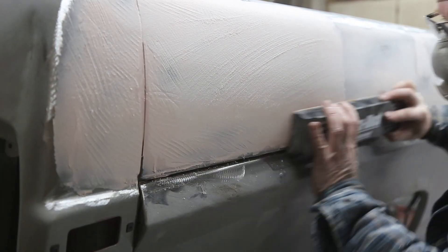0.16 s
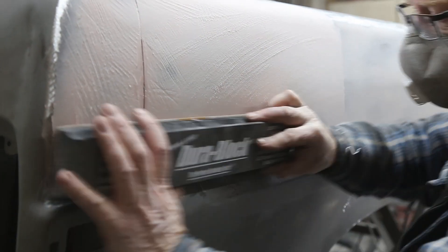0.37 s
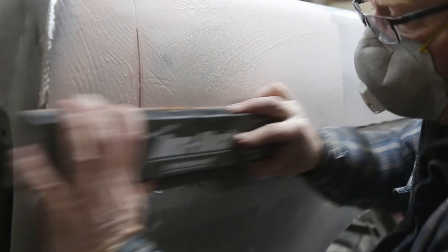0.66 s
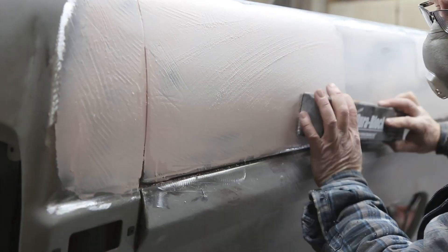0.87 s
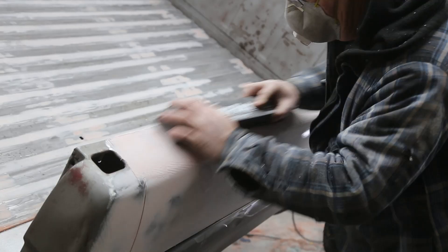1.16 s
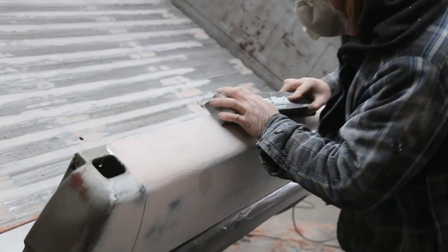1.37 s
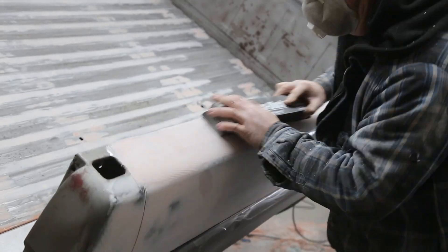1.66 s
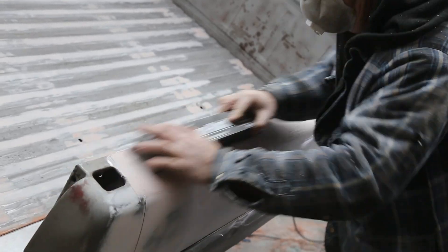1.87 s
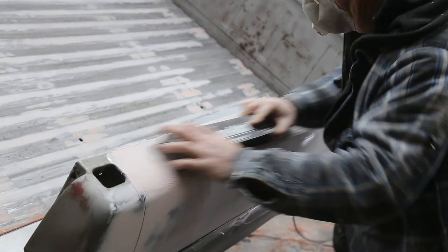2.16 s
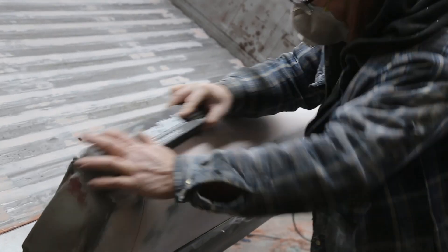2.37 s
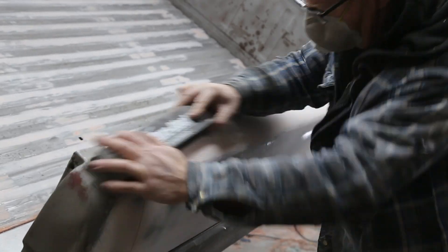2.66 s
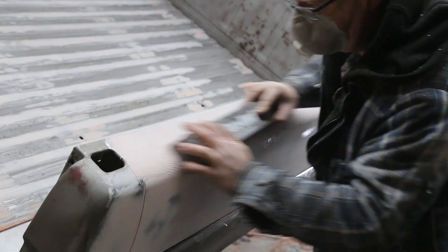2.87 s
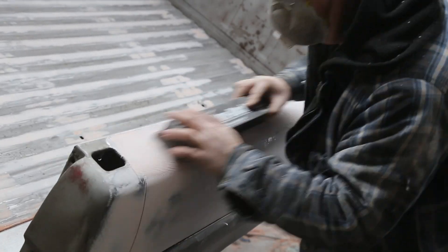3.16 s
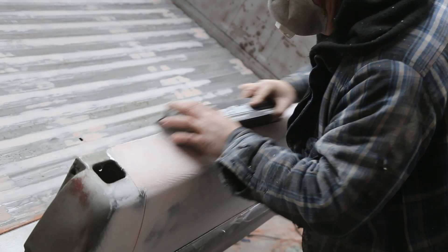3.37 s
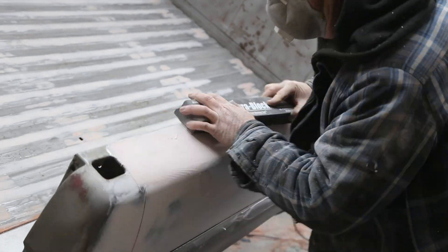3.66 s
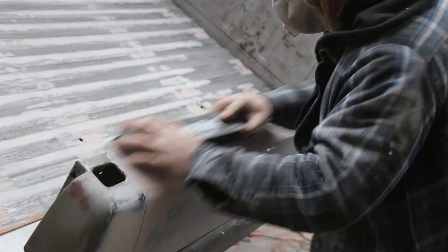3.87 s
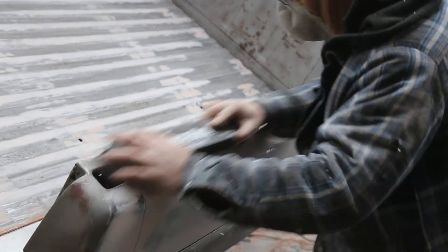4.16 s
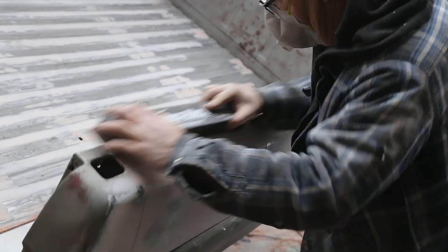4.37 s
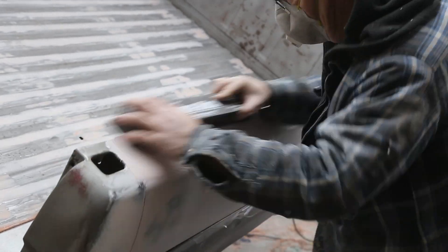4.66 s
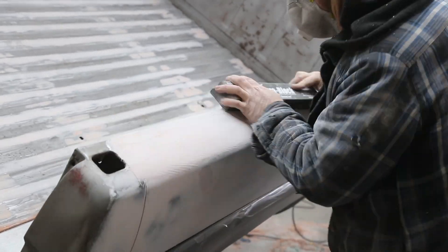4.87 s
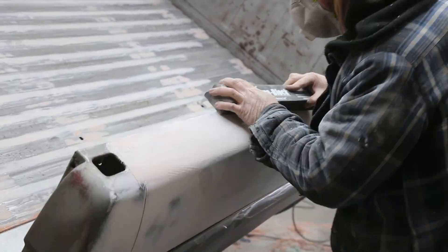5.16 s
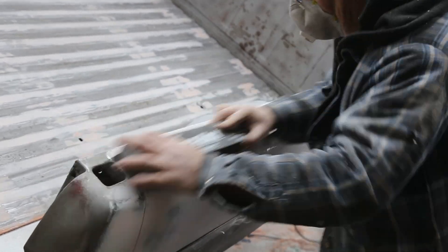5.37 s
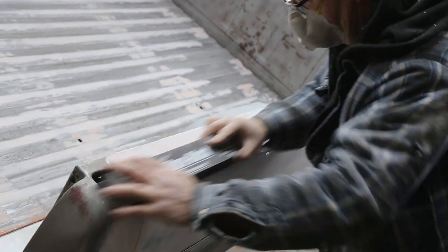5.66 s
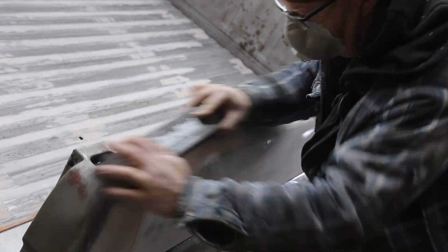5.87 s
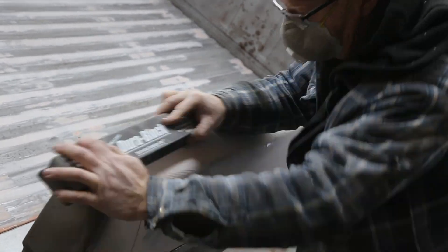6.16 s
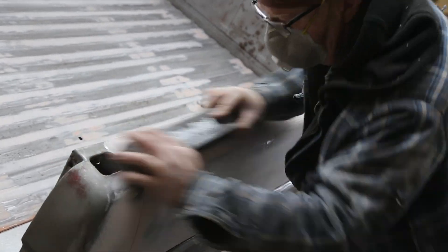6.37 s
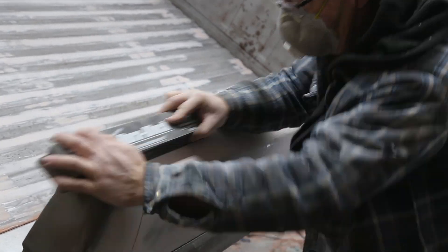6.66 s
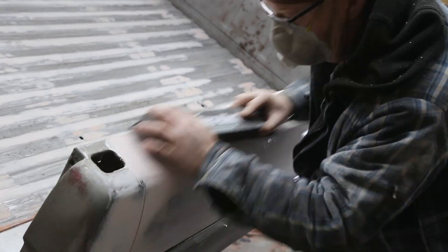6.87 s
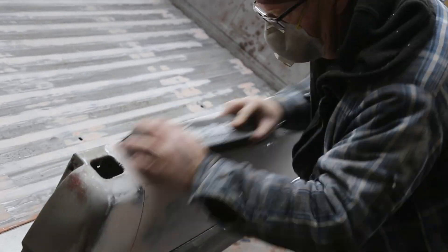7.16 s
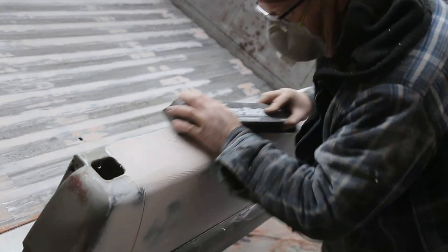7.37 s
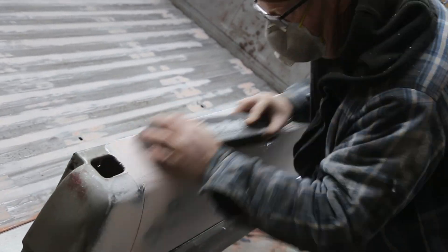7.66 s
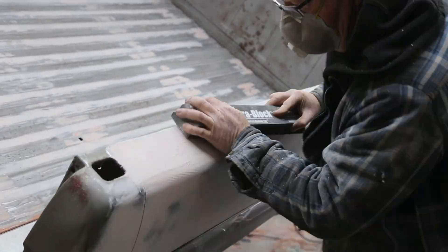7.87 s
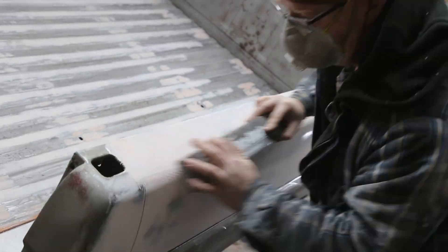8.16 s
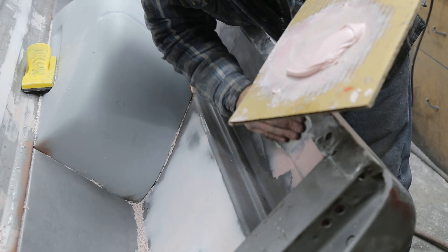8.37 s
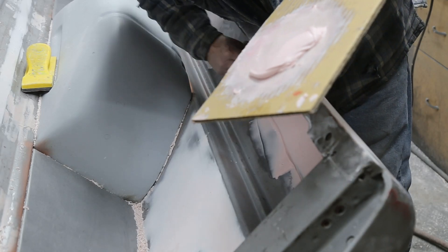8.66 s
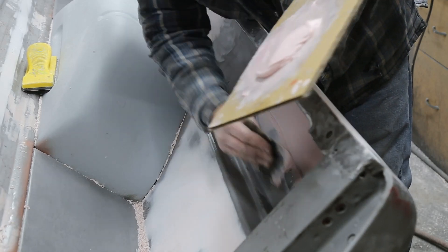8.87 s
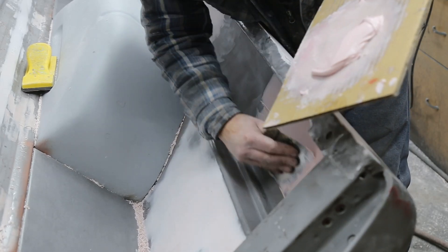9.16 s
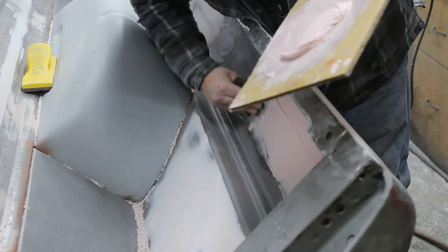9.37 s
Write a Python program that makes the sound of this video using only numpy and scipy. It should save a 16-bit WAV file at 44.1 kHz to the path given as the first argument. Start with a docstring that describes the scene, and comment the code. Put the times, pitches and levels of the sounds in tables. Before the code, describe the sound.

Close, dry sound in a garage with very quiet air. From 0 s a long hand sanding block starts at once on filler over an upright steel side, its first strokes slower, about a fifth of a second each, with a gritty scrape and bright rasp. At about 1.15 s it changes to a hollow steel rail: steady pull-push strokes, around seven a second, hissing brighter as they speed up and dipping at each turn, over a low, fluctuating metal drone. Dull bumps shudder at about 2.3 and 3.7 s, and more strongly around 5.7 to 6.3 s, with another at 8.1 s. At 8.24 s the sanding cuts off abruptly, leaving faint low hum. A spreader swipes brightly over a ringing panel at 8.7 s, bites sharply at 9.0 s, then gives weaker scrapes from 9.2 s and another clear swipe near 9.5 s.

```python
"""A long sanding block, pulled and pushed by hand, rasps on body filler on a steel truck in a garage.
It starts on the cab side, then moves to a hollow bed rail that drones under it. Each sound is shaped noise:
pressure makes the rasp and shakes the steel, and the hiss follows the speed of each stroke. Bumps shudder.
Then the scene changes abruptly: a spreader swipes filler over a ringing steel panel, above a faint hum."""
import sys
import numpy as np
from scipy import signal
from scipy.fft import rfft, irfft, next_fast_len
from scipy.io import wavfile
from scipy.ndimage import uniform_filter1d, map_coordinates

SR = 44100
rng = np.random.default_rng(int(sys.argv[2]) if len(sys.argv) > 2 else 0)


def master_out(mix):
    """Clip the mix to full scale and print it as 16-bit PCM to the path in sys.argv[1]."""
    frames = np.transpose(np.atleast_2d(mix))
    ceiling = np.clip(frames, -1, 1)
    pcm = np.round(ceiling * 32767).astype(np.int16)
    wavfile.write(sys.argv[1], SR, pcm)


N = 419387
TIME = np.arange(N) / SR
FFT_SIZE = next_fast_len(N + 8192)  # spare room, so that filtering does not wrap around
HZ = np.fft.rfftfreq(FFT_SIZE, 1 / SR)
RAIL_START, SPREAD_START = 1.15, 8.237  # s
TOP_HZ = 15830  # nothing is kept from here up

# Sanding strokes, pull and push in turn.
# Columns: turn t/s, time to full speed t/s, base hiss level/dB, base rasp level/dB
STROKES = [(0.0, 0.012, -49, -38), (0.049, 0.017, -38.5, -33.5), (0.141, 0.042, -25.5, -20),
           (0.405, 0.021, -26.5, -23), (0.534, 0.034, -25, -20.5), (0.745, 0.025, -26.5, -23.5),
           (0.925, 0.04, -24.0, -22), (1.122, 0.049, -24.0, -20), (1.293, 0.058, -24.5, -22),
           (1.417, 0.03, -24, -22.0), (1.584, 0.076, -24.0, -22.5), (1.714, 0.016, -25.0, -21.5),
           (1.872, 0.08, -25.5, -24.5), (1.993, 0.018, -25.0, -22.5), (2.148, 0.05, -25.5, -23),
           (2.274, 0.035, -24.0, -21.5), (2.444, 0.064, -25.5, -24.0), (2.579, 0.043, -23.5, -21.0),
           (2.732, 0.036, -24.0, -23.5), (2.856, 0.047, -23, -21.0), (3.024, 0.022, -26.0, -22.5),
           (3.16, 0.059, -22.5, -20), (3.312, 0.036, -25.5, -24.5), (3.434, 0.025, -24.5, -23),
           (3.58, 0.044, -25.5, -26), (3.702, 0.023, -23.5, -22), (3.855, 0.045, -25.5, -25),
           (3.994, 0.023, -23.5, -21.5), (4.155, 0.048, -24.5, -23.0), (4.307, 0.022, -24.0, -23.0),
           (4.467, 0.079, -25.5, -24.0), (4.608, 0.02, -24.5, -22), (4.762, 0.093, -24, -24.5),
           (4.912, 0.025, -24.5, -23.5), (5.073, 0.13, -22.5, -23.0), (5.211, 0.029, -23.5, -22.5),
           (5.368, 0.034, -24.5, -22.5), (5.511, 0.026, -24.5, -22.0), (5.674, 0.06, -25.0, -26.5),
           (5.806, 0.054, -23.5, -22.0), (5.961, 0.031, -27.0, -27), (6.083, 0.038, -23.5, -23.0),
           (6.223, 0.022, -26, -26.5), (6.342, 0.041, -24, -22.0), (6.48, 0.039, -24.5, -23.5),
           (6.593, 0.05, -23.5, -21.5), (6.726, 0.059, -24.0, -23.5), (6.858, 0.047, -24.5, -20),
           (7.005, 0.073, -26.5, -23.5), (7.137, 0.039, -24.5, -21.5), (7.273, 0.09, -26, -24),
           (7.399, 0.031, -24.0, -21.5), (7.534, 0.076, -27, -23.5), (7.658, 0.026, -24.5, -22.5),
           (7.789, 0.022, -25.5, -23.5), (7.919, 0.03, -23.5, -22.5), (8.055, 0.018, -28, -26.5),
           (8.179, 0.035, -25.0, -24)]
# Spreader swipes. Columns: start t/s, rise t/s, time to fade by 60 dB t/s (treble fades faster),
# base level/dB, brightness/(dB per octave), how freely the panel rings/(0-1)
SWIPES = [(8.672, .044, 0.31, -16.5, 6, 0.8), (8.987, 0.015, 0.13, -14.5, 1.1, 0.9),
          (9.0, .022, 0.42, -21, -0.5, 1), (9.06, .05, 0.2, -32.5, -3.5, 1),
          (9.19, 0.032, 0.44, -40.5, -1.5, 0.6), (9.292, 0.015, 0.39, -31.5, 2, .35),
          (9.325, 0.021, 0.55, -37, 0.5, 0.8), (9.375, 0.083, .6, -27, -0.5, 1),
          (9.47, 0.044, .3, -20.5, 6, 0.4)]
# Broad colour of each steel part under the tool. Columns: f/Hz, relative level per Hz/dB
CAB_COLOUR = [(30, -46), (100, -43), (290, -57), (550, -28.5), (800, -44), (1200, -4), (4000, -1),
              (8000, -4), (13000, -8), (15800, -17)]
RAIL_COLOUR = [(30, -43), (60, -45), (110, -33.5), (300, -39.5), (600, -28), (800, -17), (2500, -1.5),
               (4500, -0.5), (9000, 0.5), (13000, 1), (15800, -5)]
PANEL_COLOUR = [(60, -47), (300, -23), (620, -17.5), (780, -9), (1100, 0.5), (2500, -0.5), (5500, -3),
                (9000, -7), (15800, -21)]
# Resonances of each part; the panel's lift is for free ringing. Columns: f/Hz, width/Hz, lift/dB
CAB_MODES = [(222, 59, 26), (379, 130, 27.5), (570, 35, 11.5), (730, 142, 25), (808, 73, 27.5),
             (919, 69, 24.5), (1085, 53, 13.5), (2270, 34, 6.5), (2721, 56, 3.5)]
RAIL_MODES = [(118, 60, 10.3), (158.4, 8.8, 10.5), (227, 77, 24), (282, 16, 6.1), (361.5, 112, 14),
              (414, 112, 21.8), (557, 53, 12.7), (715, 213, 16.4), (783.3, 11, 11.4), (888, 100, 10.8),
              (961.6, 30, 14), (1071, 48, 12.7), (1179, 147, 7.6), (1260, 51, 8.6), (1391, 16, 12.6),
              (1570, 256, 11.5), (1758, 63, 5.2), (1987, 166, 6.7), (2191, 22, 8.9), (2393, 72, 5.5),
              (2567, 39, 7.4), (2737, 25, 6.3), (2920, 410, 3.5), (3526, 36, 4.3), (3814, 160, 5.6),
              (5900, 33, 3.9)]
PANEL_MODES = [(360, 40, 12), (572, 27, 7), (780, 30, 8), (945, 45, 9), (1180, 40, 6), (1272, 32, 17),
               (2290, 26, 6), (2580, 50, 8), (2840, 32, 6), (3650, 30, 8)]
# Colour of the garage air. Columns: f/Hz, relative level per Hz/dB
AIR_COLOUR = [(18, -77), (30, -43), (64, -16), (100, -21), (133, -12), (213, -14.5), (270, -8), (432, -8.5),
              (921, -10.5), (10200, -25), (15500, -27)]
# Tones of the faint hum, which waver around these values. Columns: f/Hz, level/dB
HUM_TONES = [(134, -72.5), (269, -67.5)]
# The block bumps on the steel as it turns. Columns: t/s, base level/dB
BUMPS = [(.06, -35), (1.15, -41), (2.262, -35), (3.705, -41), (5.713, -31), (5.993, -27.5), (6.05, -37.5),
         (6.259, -28), (8.105, -31.5)]
# Colour of the dull answer to a bump. Columns: f/Hz, relative level per Hz/dB
THUD_COLOUR = [(60, -43), (200, -39), (350, -20), (420, 5), (500, -13), (650, -4), (830, 3), (1000, -24),
               (2000, -23), (6000, -45)]
# How readily the steel under the block shakes. Columns: t/s, base scrape level/dB, base drone level/dB
SHEET_GIVE = [(0.0, -39, -38.5), (0.12, -34.5, -48), (0.2, -28, -47.5), (0.55, -31.5, -51.0),
              (1.2, -36.5, -46.5), (1.6, -33.5, -50.0), (2.1, -36, -48), (2.6, -32.5, -45.5),
              (3.3, -32, -47), (3.7, -35, -47.5), (4.4, -33, -46.0), (5.3, -34, -46), (5.9, -34.5, -44),
              (6.4, -33, -42), (7.1, -35.5, -48.0), (7.7, -36.5, -46), (8.22, -35, -44.5)]
# The block rides up near a turn and loses its bite. Columns: t/s, loss of rasp and scrape level/dB
SKIPS = [(.045, 9), (5.986, 4.5), (6.245, 4), (7.043, 7), (7.309, 7), (7.567, 6), (7.826, 11), (8.096, 8)]
# The block digs in at the end of a pull and shakes the rail. Columns: t/s, gain of scrape level/dB
DIGS = [(2.6, 3), (4.3, 7), (4.585, 5.5), (5.185, 7)]

# How a stroke moves
LAST_TURN_S = 8.33  # where the last push would end
PUSH_BRAKE, PULL_BRAKE = 3.1, 3.8  # the higher, the later in the stroke the block slows
STICK_SHARE = 0.22  # share of the run-up for which the paper sticks before it slides
JERK_DB, JERK_S = 0.5, 0.055  # extra bite as a push breaks free, and its fading time
# How much is lost when the block stands still; no weight rests on it on the upright cab side
RASP_SPEED_DB, CAB_RASP_SPEED_DB, HISS_SPEED_DB, FIZZ_SPEED_DB = 3, 5, 9, 13.5
RASP_REACH_DB, SCRAPE_REACH_DB = 3.5, 3  # lost at arm's length on the rail: less weight on the block
PUSH_DAMPING_DB = 5.5  # most that the pushed block can take from the drone
SKIP_S, DIG_S = 0.018, 0.043  # spread of each skip and dig to either side
DIG_DRONE_SHARE = 0.53  # share of a dig's dB gain that reaches the drone
HEAVE_DB, HEAVE_S = 4.5, 0.025  # the rail booms as weight comes on for a push: lift, spread either side


def amp(db):
    """Turn decibels into a gain."""
    return 10 ** (np.asarray(db) / 20)


def unit(x):
    """Scale a signal to an rms level of 1."""
    return x / np.sqrt(np.mean(x ** 2) + 1e-20)


def curves(rows):
    """Join the table rows by straight lines: one curve for each column after the time."""
    seconds, *columns = np.transpose(rows)
    return [np.interp(TIME, seconds, column) for column in columns]


def swells(rows, spread_s):
    """Add up bell-shaped swells in dB, one for each row of time and height."""
    return sum(db * np.exp(-np.minimum(((TIME - s) / spread_s) ** 2, 20)) for s, db in rows)


def wobble(rate):
    """Draw a smooth random curve with the given number of random points a second."""
    knots = rng.standard_normal(int(N * rate / SR) + 4)
    return map_coordinates(knots, [TIME * rate])


def filtered(x, gain):
    """Apply a gain to each frequency in HZ."""
    return irfft(rfft(x, FFT_SIZE) * gain, FFT_SIZE)[:N]


def colour(points, modes=()):
    """Give the gain of a broad spectrum with resonances standing on it."""
    hz, db = np.transpose(points)
    lift = sum(lift_db / (1 + (2 * (HZ - centre) / width) ** 2) for centre, width, lift_db in modes)
    return amp(np.interp(np.log(HZ + 1), np.log(hz), db) + lift)


def below(edge_hz, order=8):
    """Give the gain of a filter that keeps what lies below the edge."""
    return 1 / np.sqrt(1 + (HZ / edge_hz) ** (2 * order))


def above(edge_hz, order=8):
    """Give the gain that keeps the power which below() takes away."""
    return np.sqrt(1 - below(edge_hz, order=order) ** 2)


def grit(catches, share):
    """Mix countless fine scratches with coarse grains that catch so many times a second on average."""
    coarse = rng.standard_normal(N) * (rng.random(N) < catches / SR)
    return np.sqrt(1 - share) * rng.standard_normal(N) + np.sqrt(share) * unit(coarse)


def sheet(x, depth_db, size=2048):
    """Let the moving tool favour ever different ones among the sheet's many close resonances."""
    spectrum = signal.stft(x, nperseg=size)[2]
    field = rng.standard_normal(spectrum.shape)
    field = uniform_filter1d(field, size=2, axis=0)  # smooth over frequency
    field = uniform_filter1d(field, size=7, axis=1)  # smooth over time
    return signal.istft(spectrum * amp(depth_db * unit(field)), nperseg=size)[1][:N]


def garage():
    """Quiet air is coloured noise; a slightly unsteady hum joins it where the filler is spread."""
    noise = filtered(rng.standard_normal(N), colour(AIR_COLOUR))
    air = amp(-53.5 + 0.17 * wobble(5)) * unit(noise)
    hum = np.zeros(N)
    for hz, db in HUM_TONES:
        level = amp(db + 2.0 * wobble(4)) * np.sqrt(2)  # sqrt(2) turns rms into peak
        hum += level * np.sin(2 * np.pi * hz * TIME + 0.5 * wobble(5.2))
    return np.where(TIME < SPREAD_START, amp(-2.5) * air, air + hum)


def spreader():
    """Each swipe swells as the blade drags, then rings out, the treble dying first; the room lingers."""
    drag, out = sheet(grit(3000, 0.17), depth_db=4.0, size=4096), np.zeros(N)
    octaves = np.log2(np.maximum(HZ, 1000) / 3000)
    treble_gain = above(6200, order=3) ** 2
    for start, rise, t60, db, tilt_db, freedom in SWIPES:
        # the pressing hand damps the resonances
        modes = np.array(PANEL_MODES) * [1, 1, np.clip(freedom, 0, 1)]
        panel = colour(PANEL_COLOUR, modes)
        rub = unit(filtered(drag, panel * amp(tilt_db * octaves)))
        treble = filtered(rub, treble_gain)
        swell = np.clip((TIME - start) / rise, 0, 1) ** (0.51 + 25 * rise)  # quick swipes bite at once
        since = np.maximum(TIME - start - rise, 0)
        fade_db = -60 * since / t60
        body_ring = (rub - treble) * amp(fade_db)
        treble_ring = treble * amp(1.8 * fade_db)
        room = rub * amp(-31 - 60 * since / 0.57)
        out += amp(db) * swell * (body_ring + treble_ring + room)
    return out


def bumps():
    """Each bump sets the sheet shuddering: dull noise that starts fast and dies away."""
    shudder = unit(filtered(rng.standard_normal(N), colour(THUD_COLOUR)))
    level = np.zeros(N)
    for start, db in BUMPS:
        since = np.maximum(TIME - start, 0)
        level += amp(db - 60 * since / 0.38) * (1 - np.exp(-since / 0.003))
    return level * shudder * (TIME < SPREAD_START)


def stroke_motion():
    """Give speed, reach of the arms and thrust (all 0-1), and the base hiss and rasp levels in dB."""
    turn, runup_s, hiss_db, rasp_db = np.transpose(STROKES)
    stroke = np.maximum(np.searchsorted(turn, TIME, side="right") - 1, 0)
    previous = np.maximum(stroke - 1, 0)
    since = np.maximum(TIME - turn[stroke], 0)
    length_s = np.diff(np.append(turn, LAST_TURN_S))
    progress = np.clip(since / length_s[stroke], 0, 1)

    on_rail = TIME >= RAIL_START
    pushing = (stroke % 2 == 1) | ~on_rail  # on the upright cab side both directions go like a push
    sliding = np.clip((since / runup_s[stroke] - STICK_SHARE) / (1 - STICK_SHARE), 0, 1)
    runup = 1 - (1 - sliding) ** 3
    brake = np.where(pushing, PUSH_BRAKE, PULL_BRAKE)
    speed = runup * np.cos(np.pi / 2 * progress ** brake) ** 2
    reach = np.where(pushing, progress, 1 - progress) * on_rail
    thrust = pushing * speed * progress
    jerk_db = JERK_DB * pushing * np.exp(-since / JERK_S)

    def glide(db):
        """Let each stroke take over from the one before during its run-up."""
        return db[previous] * (1 - runup) + (db[stroke] + jerk_db) * runup

    return speed, reach, thrust, glide(hiss_db), glide(rasp_db)


def steel_levels(reach, thrust, skip_db):
    """Give scrape and drone in dB: steel shakes more near the body, where weight bears on the block."""
    scrape_db, drone_db = curves(SHEET_GIVE)
    dig_db = swells(DIGS, DIG_S)
    pushes = [(s, HEAVE_DB) for s, *_ in STROKES[1::2] if s > RAIL_START]
    heave_db = swells(pushes, HEAVE_S)
    scrape_db = scrape_db + dig_db - skip_db - SCRAPE_REACH_DB * reach
    drone_db = drone_db + DIG_DRONE_SHARE * dig_db + heave_db - PUSH_DAMPING_DB * thrust
    return scrape_db, drone_db


def rubbed(drive, band):
    """Give one band of the steel's answer to the grit: first the cab side, then the rail."""
    cab = unit(filtered(drive, colour(CAB_COLOUR, CAB_MODES) * band))
    rail = unit(filtered(drive, colour(RAIL_COLOUR, RAIL_MODES) * band))
    return np.where(TIME < RAIL_START, cab, rail)


def sanding():
    """Pressure shakes the sheet and makes the rasp; speed makes the hiss and brightens it."""
    speed, reach, thrust, hiss_db, rasp_db = stroke_motion()
    slack = 1 - speed
    skip_db = swells(SKIPS, SKIP_S)
    rasp_speed_db = np.where(TIME < RAIL_START, CAB_RASP_SPEED_DB, RASP_SPEED_DB)
    bite_db = rasp_db - rasp_speed_db * slack - RASP_REACH_DB * reach - skip_db
    scrape_db, drone_db = steel_levels(reach, thrust, skip_db)
    judder_db = 0.72 * wobble(70)  # the paper grips unevenly
    boom_db = 1.25 * wobble(25)  # the drone comes and goes

    # five bands, from the lowest to the highest
    drone = rubbed(sheet(grit(600, 0.046), depth_db=1.3), below(575))
    drone *= amp(drone_db + boom_db + 0.6)

    scrape = rubbed(sheet(grit(1400, 0.075), depth_db=1.5), above(550) * below(1437))
    scrape *= amp(scrape_db + judder_db + 0.8)

    contact = sheet(grit(2800, 0.15), depth_db=0.62, size=256)  # the shifting contact recolours the rasp
    rasp_tilt = amp(1.2 * np.log2(1 + HZ / 1500))
    rasp = rubbed(sheet(contact, depth_db=2.5), above(1480) * below(5480, order=5) * rasp_tilt)
    rasp *= amp(bite_db + judder_db + 0.54)

    hiss_band = above(5550, order=5) * below(9300, order=4)
    hiss = rubbed(sheet(grit(4000, 0.2), depth_db=2.5), hiss_band)
    hiss *= amp(hiss_db + judder_db - HISS_SPEED_DB * slack + 0.84)

    fizz = rubbed(sheet(grit(4500, 0.25), depth_db=2.0), above(9400, order=4))
    fizz *= amp(hiss_db + judder_db - FIZZ_SPEED_DB * slack + 0.6)
    return (drone + scrape + rasp + hiss + fizz) * (TIME < SPREAD_START)


def scene():
    """Add up all sources and put the same signal in both channels."""
    return np.tile(garage() + spreader() + bumps() + sanding(), (2, 1))


def record(dry):
    """Keep only the frequencies below the upper limit."""
    return np.array([filtered(channel, HZ < TOP_HZ) for channel in dry])


dry = scene()
out = record(dry)
master_out(out)
```